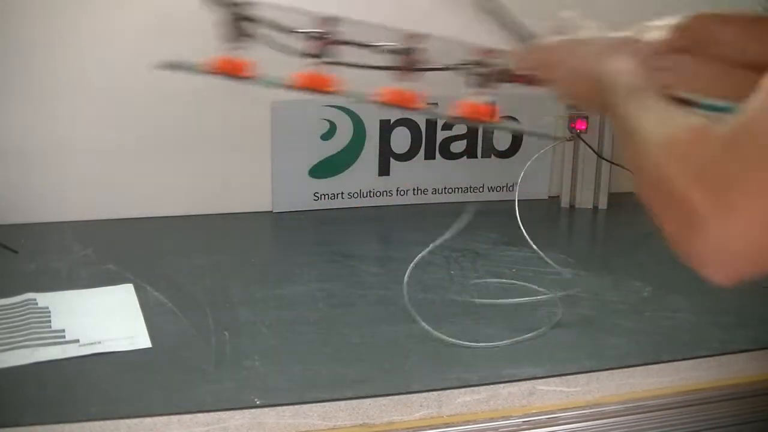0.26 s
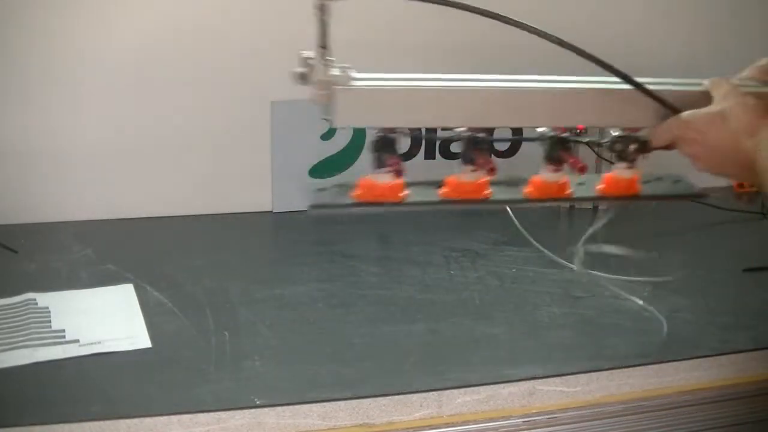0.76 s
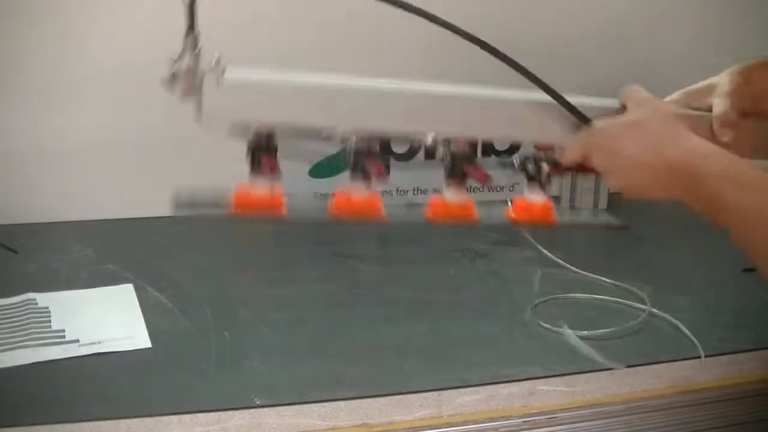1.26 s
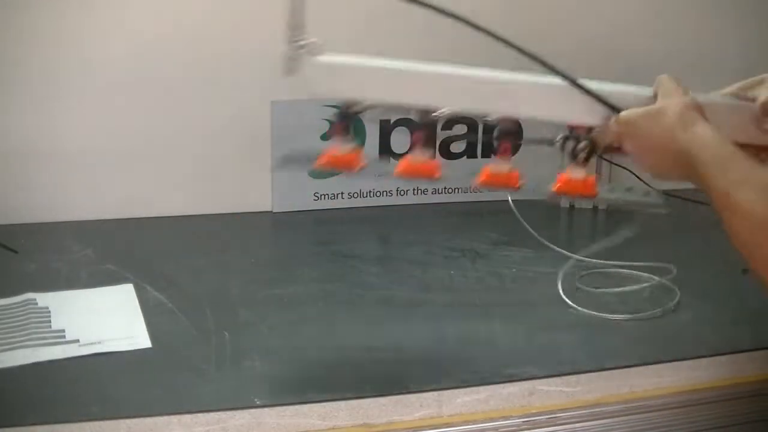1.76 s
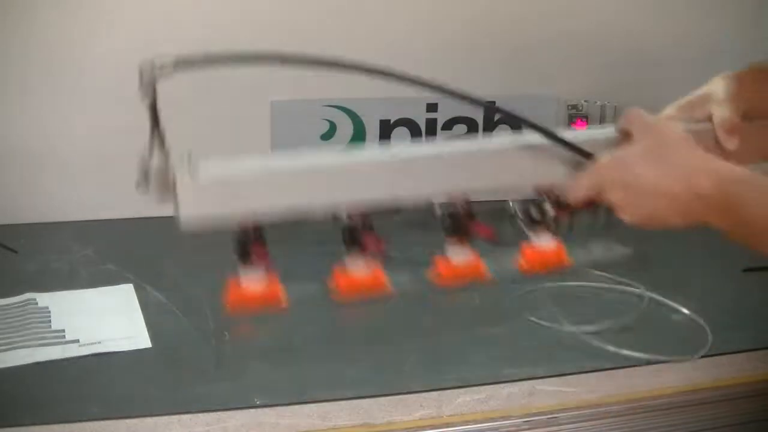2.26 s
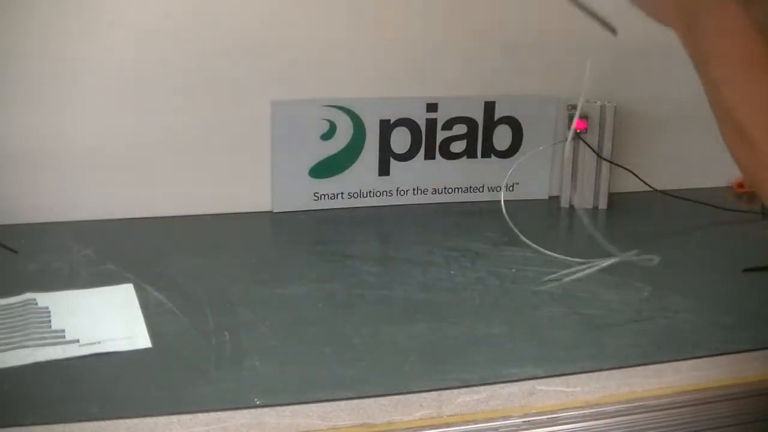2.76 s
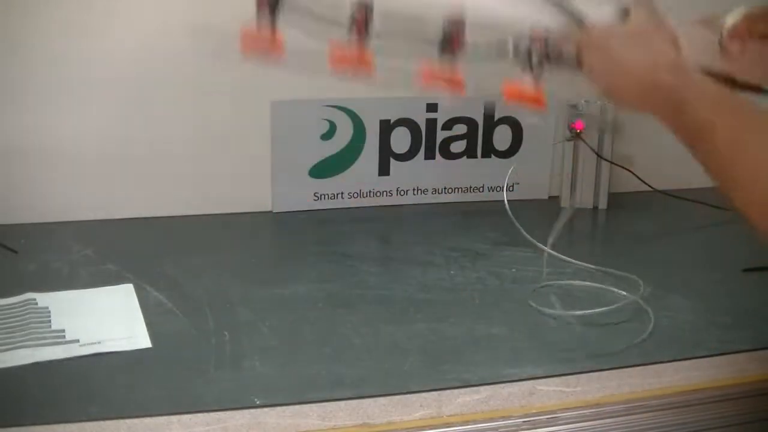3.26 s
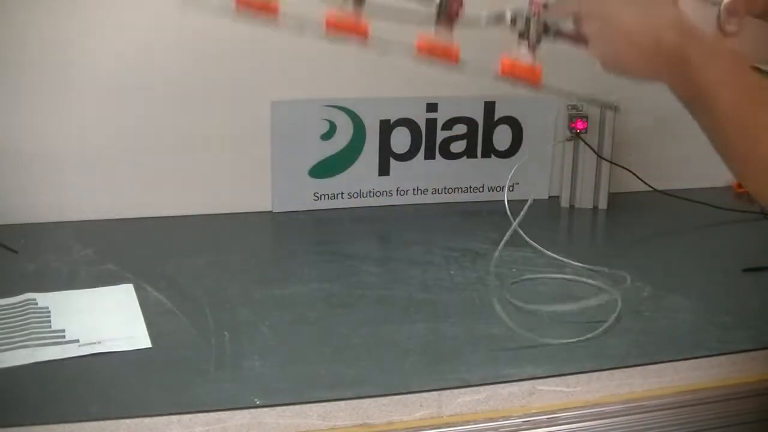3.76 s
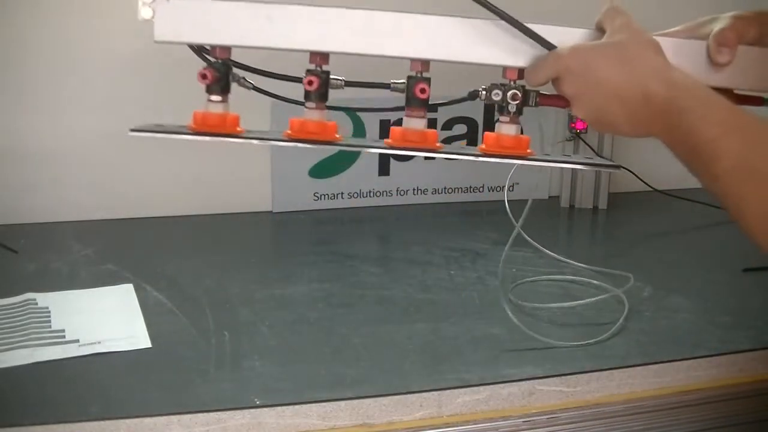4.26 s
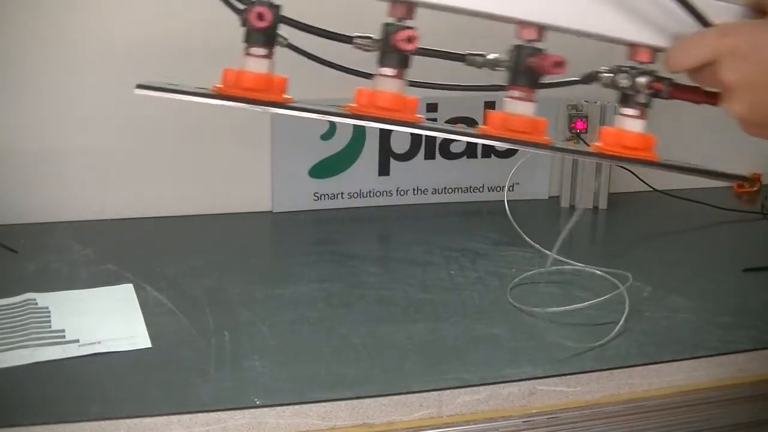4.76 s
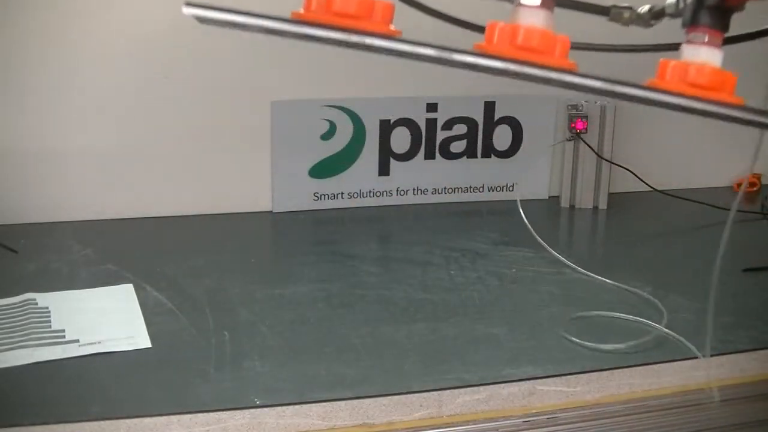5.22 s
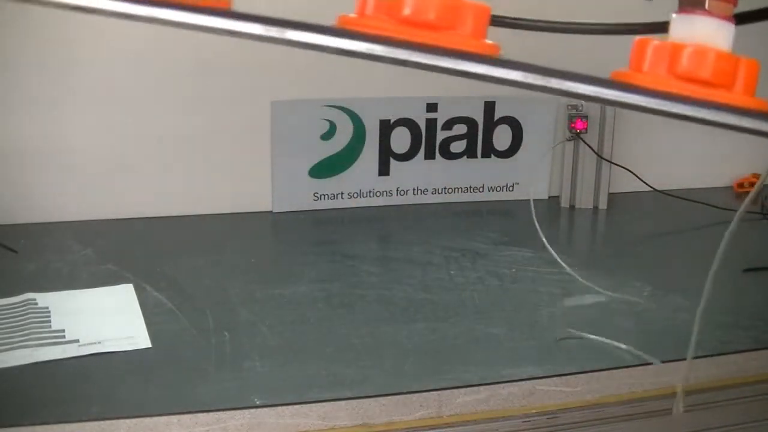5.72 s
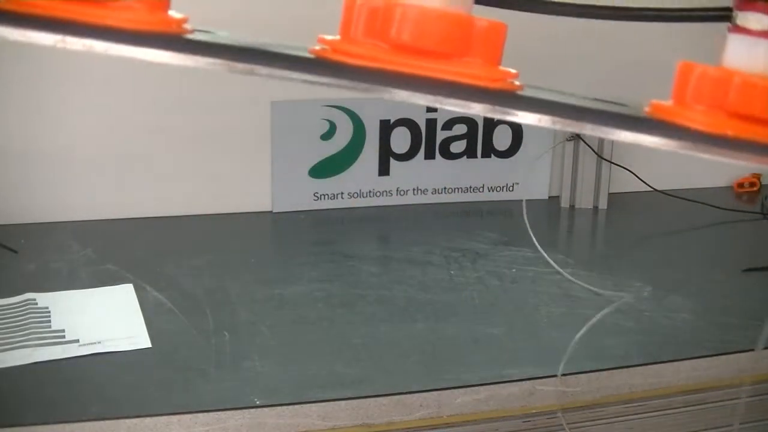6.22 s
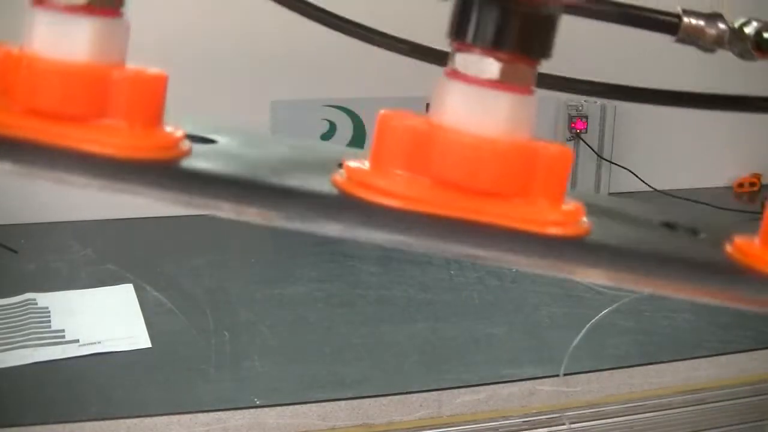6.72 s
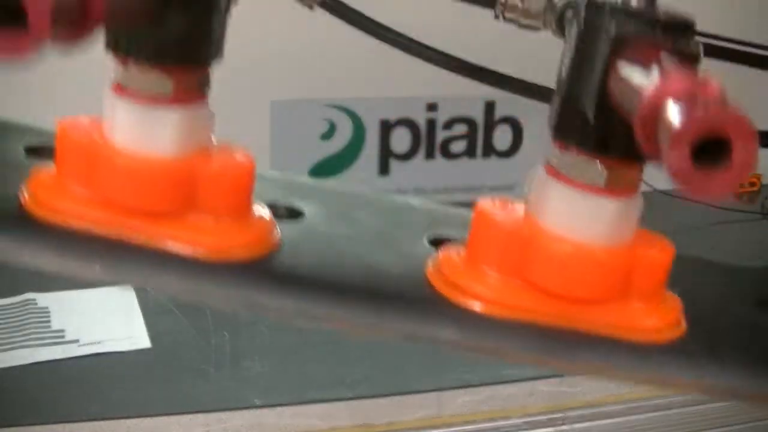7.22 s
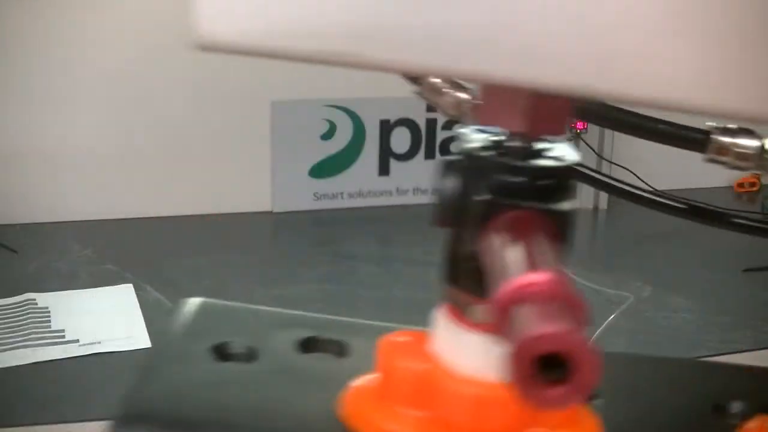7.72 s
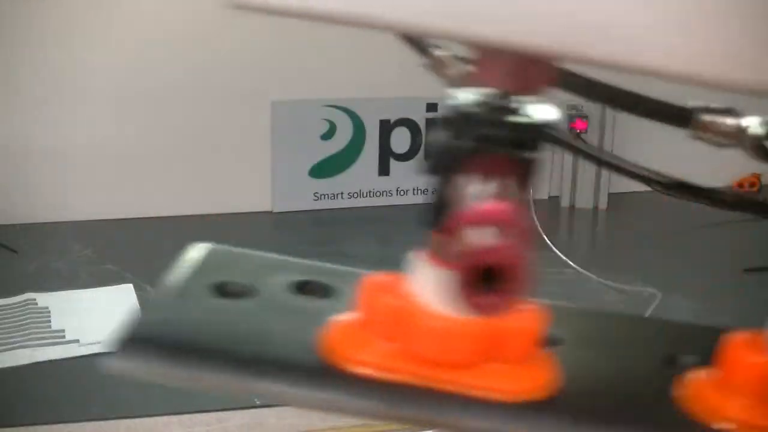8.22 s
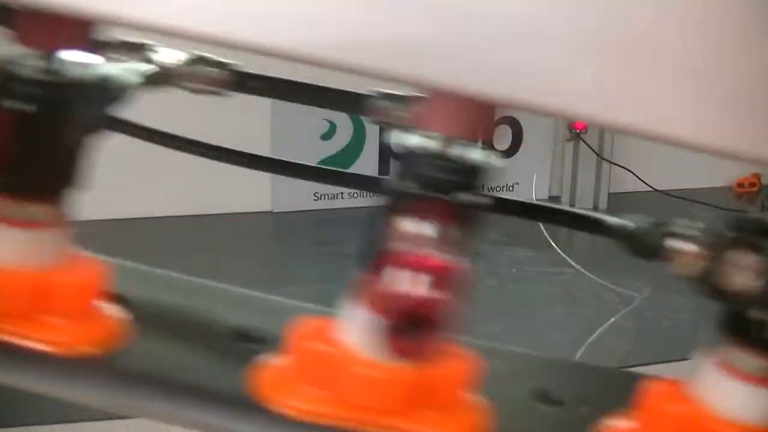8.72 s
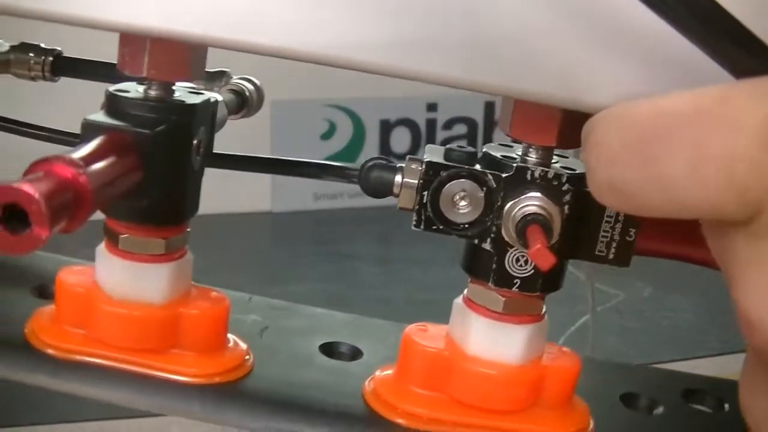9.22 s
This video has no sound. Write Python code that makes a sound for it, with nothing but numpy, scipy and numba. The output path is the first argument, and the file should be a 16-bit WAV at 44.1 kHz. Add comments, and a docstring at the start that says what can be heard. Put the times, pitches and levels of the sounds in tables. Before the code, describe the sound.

Small air jets on a vacuum gripper hiss without a break, high and sharp over a softer roar, changing colour slightly as they move. A faint machine hum cuts out midway, leaving low workshop ventilation underneath. In the second half the jets draw near the microphone and their draught hits it in short, fluttering gusts. The hiss ends close and wide in stereo.

```python
"""A bright, steady hiss of air: four small ejectors on a hand-held vacuum gripper, swung about in a
workshop and then brought close to a stereo camera. The jets ring their nozzles at two broad pitches
over a lower roar, and a bounce off the bench combs the sound. Puffs of exhaust buffet the two
microphone ports, mostly in opposite senses. Behind it the ventilation murmurs, and a machine drones
for about the first five seconds."""
import sys
import numpy as np
from scipy import signal
from scipy.fft import rfft, irfft, next_fast_len
from scipy.io import wavfile
from scipy.ndimage import uniform_filter1d, map_coordinates
from numba import njit

SR = 44100
rng = np.random.default_rng(int(sys.argv[2]) if len(sys.argv) > 2 else 0)


def log_audio(samples):
    """Write samples as a 16-bit WAV file to the path given in sys.argv[1]."""
    # one column per channel
    frames = np.atleast_2d(samples).T
    # limit to full scale, then quantise
    limited = np.clip(frames, -1, 1)
    pcm = np.round(limited * 32767).astype(np.int16)
    wavfile.write(sys.argv[1], SR, pcm)


N = 418068

# How the gripper is held. Each row: time in seconds, aim of the exhausts at the camera from 0 to 1,
# nearness from 0 to 1, level of the first ring in dB.
GRIPPER_POSE = [(0, 0.6, 0.5, -20.5), (.35, 0.35, 0.15, -20.5), (.7, 0.6, 0.25, -21.5),
                (1.1, 0.87, 0, -20.5), (1.55, 0.36, 0.3, -21.5), (2.1, 0.88, 0, -20.5),
                (2.55, 0.23, 0.05, -22.5), (2.85, 0.1, 0, -21.5), (3.1, 0.7, 0.2, -20), (3.4, 0.1, 0, -22),
                (3.75, 0.16, 0, -22), (4.05, 0.43, 0.1, -19), (4.5, 0.24, 0, -20), (5.1, 0, 0, -22.5),
                (5.6, 0.1, 0.34, -23.5), (7.1, 0.27, .8, -24.3), (7.5, 0.63, 0.7, -24),
                (8.05, 0.8, 0.6, -23.5), (8.35, 0.66, 0.6, -24), (9, 0.7, 0.9, -24.5), (9.48, 0.6, 1, -23)]
# Colours of the jets: bright rush, top fizz, low roar. Each row: frequency in Hz, relative level in dB.
RUSH_SPECTRUM = [(4000, -27), (5000, -25), (7500, 9.5), (9500, 6.5), (11000, 6.5), (13000, -46)]
FIZZ_SPECTRUM = [(10500, -14), (12300, 11), (13200, 5), (14300, 8), (15600, 9.5), (17000, -12)]
ROAR_SPECTRUM = [(500, -43), (750, -18.5), (1050, -14.5), (1500, -9), (1900, -5), (2250, -0.5),
                 (2650, -5.5), (3400, -19)]
# Slow fader ride on the roar and tube ring. Each row: time in seconds, level change in dB.
LOW_HISS_RIDE = [(0, -0.1), (1.2, -0.5), (2.2, -0.7), (3.8, .1), (4.5, 1.5), (5.2, -1.3), (6.5, -.3),
                 (8.2, -0.3), (9.48, 1.9)]
# Puffs of exhaust across the microphones. Each row: peak time in seconds, half length in seconds,
# rumble in dB, flutter in dB, the part alike at both ports in dB relative to the opposed part.
EXHAUST_PUFFS = [(4.49, .05, -47, -72, -4), (4.58, 0.065, -46.5, -72, 0.5), (4.69, 0.048, -43.5, -74, -2.5),
                 (4.934, .07, -43, -75, -2), (6.04, .04, -62, -77, -6), (6.28, 0.11, -62, -82, -6),
                 (6.39, 0.026, -37, -65, -1), (6.48, 0.1, -31.5, -59, -7), (6.62, 0.1, -33, -44, -3.5),
                 (6.787, 0.088, -30, -33, -6.5), (6.87, .07, -30, -35.5, -6.5),
                 (6.974, 0.11, -35.5, -34.5, -7), (7.086, 0.12, -45, -49, -4),
                 (7.258, 0.064, -41, -40, -6.5), (7.428, 0.16, -42, -50, -3.5),
                 (7.65, 0.09, -31, -28, -4.5), (7.782, 0.093, -43, -27.5, -8), (7.924, 0.086, -55, -46, -2),
                 (8.2, 0.071, -45, -39.5, -6.5), (8.286, 0.084, -48, -24, -7),
                 (8.567, 0.079, -49, -32.5, -6), (8.778, 0.075, -50, -29.5, -5.5)]
# Colours of the draught: deep rumble, higher flutter. Each row: frequency in Hz, relative level in dB.
RUMBLE_SPECTRUM = [(15, -18), (40, -6), (70, 2.5), (110, 2.5), (170, 1.5), (260, -6.5), (400, -12.5),
                   (700, -33), (1200, -56)]
FLUTTER_SPECTRUM = [(100, -22), (170, -12), (260, -5.5), (400, -1.5), (600, -1.5), (900, -7), (1400, -10.5),
                    (2000, -14), (3200, -32)]
# Colour of the room's ventilation. Each row: frequency in Hz, relative level in dB.
VENTILATION_SPECTRUM = [(15, -30), (25, -11), (60, -10), (124, -10), (350, -10.5), (600, -9), (1100, -14),
                        (1500, -35)]

# Mix settings that follow the pose. Each holds, in dB: the value when turned away and far, then the
# change when aimed, when near, and once alongside the camera.
SECOND_RING_DB, RUSH_DB, FIZZ_DB = (-25, -7.5, 0.2, -4), (-31.5, 4.5, -1.5, -1.5), (-29, -7, 2, -1.3)
ROAR_DB, TUBE_DB, GAP_DB = (-38, 2.4, -1.7, -4.5), (-31, -3.5, 1.5, -3.2), (-38.5, 9.5, -0.5, 0.5)
HIGH_SPREAD_DB, LOW_SPREAD_DB = (-13.5, -0.4, 6.5, 1), (-44, -3, 1, 37.5)
PAN_DB = (2.5, 0.2, -0.6, 1.5)

FIRST_RING_HZ, FIRST_WIDTH_HZ, SECOND_RING_HZ, SECOND_WIDTH_HZ = 6050, 1480, 11635, 2440
TUBE_HZ, TUBE_WIDTH_HZ, GAP_HZ, GAP_WIDTH_HZ = 3343, 1510, 5150, 4100
MONO_BELOW_HZ = 4005  # the bright hiss is centred below this and wide above it
PUFF_FALL_DB = 13.5  # one half length away from the peak
BENCH_LAG_MS, BENCH_SWING_MS, BENCH_DB = 1.277, 0.311, -18
DRONE_HZ, DRONE_DB, VENTILATION_DB = 417, -52, -53.5


def ejectors():
    """Jet noise in and around two nozzle rings, centred below about 4 kHz and wide above it."""
    aim, near, first_db = curves(GRIPPER_POSE)
    spread_db, pan_db = posed(HIGH_SPREAD_DB), posed(PAN_DB)
    first_hz = FIRST_RING_HZ + np.maximum(260 * aim * (1 - near), 80 * near)
    second_hz = (SECOND_RING_HZ - 400 * aim) * (1 + 0.006 * wander(2.99))
    flow_db = 0.43 * wander(25)  # the air supply is never quite even
    first_db = first_db + 0.45 * wander(12)
    first = undb(first_db) * stereo(*rings(first_hz, FIRST_WIDTH_HZ), spread_db + 1, pan_db)
    second_db = posed(SECOND_RING_DB) + flow_db
    second = undb(second_db) * stereo(*rings(second_hz, SECOND_WIDTH_HZ), spread_db + 6, pan_db)
    rush_db = posed(RUSH_DB) + 1.05 * wander(18)
    rush = undb(rush_db) * stereo(*noises(RUSH_SPECTRUM), spread_db + 9, pan_db)
    fizz = undb(posed(FIZZ_DB) + flow_db) * stereo(*noises(FIZZ_SPECTRUM), spread_db + 5, pan_db)
    left, right = first + second + rush + fizz
    highpass = signal.cheby2(8, 50, MONO_BELOW_HZ, "high", fs=SR, output="sos")
    side = signal.sosfilt(highpass, (left - right) / 2)
    side = signal.sosfilt(highpass, side[::-1])[::-1]  # a backward pass undoes the phase shift
    return stereo((left + right) / 2, side)


def nozzle_notch(jets):
    """The nozzles partly cancel between the rings: a broad scoop, lower when near, filled when aimed."""
    aim, near, _ = curves(GRIPPER_POSE)
    notch_hz, depth = 9560 - 1500 * near, 0.42 * (1 - aim)
    return np.array([channel - depth * bandpass(channel, notch_hz, width_hz=2100) for channel in jets])


def low_hiss():
    """The body of the hiss: roar, tube and gap rings, nearly mono until the gripper is alongside."""
    drift = 1 + 0.015 * wander(2.45)
    flow_db = curves(LOW_HISS_RIDE)[0] + 0.68 * wander(9)
    roar = undb(posed(ROAR_DB) + flow_db) * noises(ROAR_SPECTRUM)
    tube = undb(posed(TUBE_DB) + flow_db) * rings(TUBE_HZ * drift, TUBE_WIDTH_HZ)
    gap = undb(posed(GAP_DB)) * rings(GAP_HZ * drift, GAP_WIDTH_HZ)
    return stereo(*(roar + tube + gap), posed(LOW_SPREAD_DB))


def bench_bounce(direct):
    """A second path off the bench top; its lag wanders with the hand and combs the hiss."""
    lag = (BENCH_LAG_MS + BENCH_SWING_MS * wander(2.5)) * SR / 1000
    echo = [map_coordinates(channel, [np.arange(N) - lag], order=3, mode="mirror") for channel in direct]
    return (direct + undb(BENCH_DB) * np.array(echo)) / np.sqrt(1 + undb(2 * BENCH_DB))


def draught():
    """Eddies strike the ports in quick uneven lumps, mostly pushing one while they pull the other."""
    lumps_db = 2.15 * wander(80)
    rumble = unit_rms(undb(lumps_db)) * noises(RUMBLE_SPECTRUM)
    flutter = unit_rms(undb(1.37 * lumps_db)) * noises(FLUTTER_SPECTRUM)
    t = np.arange(N) / SR
    power = np.zeros((2, 2, N))  # rumble or flutter, opposed or alike, sample
    for peak_s, half_s, rumble_db, flutter_db, alike_db in EXHAUST_PUFFS:
        span = slice(int((peak_s - 3 * half_s) * SR), int((peak_s + 3 * half_s) * SR))
        swell_db = -PUFF_FALL_DB * np.abs((t[span] - peak_s) / half_s) ** 3  # cubed for a flat top
        peak_db = np.add.outer([rumble_db, flutter_db], [0, alike_db])
        power[..., span] += undb(peak_db[..., None] + swell_db) ** 2
    opposed, alike = np.sqrt(power[0]) * rumble + np.sqrt(power[1]) * flutter
    return stereo(alike, opposed)


def machine_drone():
    """A wavering machine tone whose octave weakens early; it is switched off part-way."""
    phase = 2 * np.pi * np.cumsum(DRONE_HZ * (1 + 0.0015 * wander(3.12))) / SR
    tone_db = DRONE_DB - 1.5 * wander(4.08)
    octave_db = -56 - 11 * ramp(start_s=0.79, length_s=0.2) + 2 * wander(3.25)
    running = 1 - ramp(start_s=4.76, length_s=0.11)
    return np.sqrt(2) * running * (undb(tone_db) * np.sin(phase) + undb(octave_db) * np.sin(2 * phase))


def ventilation():
    """The workshop's low murmur; it widens and drops in level near the end."""
    late_drop_db = -5.5 * ramp(start_s=8.85, length_s=0.067)
    level_db = VENTILATION_DB + late_drop_db + 0.9 * wander(8.2)
    return undb(level_db) * stereo(*noises(VENTILATION_SPECTRUM), posed(LOW_SPREAD_DB) + 11.5)


def posed(setting):
    """A dB curve that follows aim, nearness and the final place beside the camera."""
    base_db, aimed_db, near_db, alongside_db = setting
    aim, near, _ = curves(GRIPPER_POSE)
    alongside = ramp(start_s=8.55, length_s=0.14)
    return base_db + aimed_db * aim + near_db * near + alongside_db * alongside


def rings(hz, width_hz):
    """Two independent streams of turbulence through a resonance, filtered twice for steep sides."""
    turbulence = rng.standard_normal((2, N))
    return np.array([unit_rms(bandpass(bandpass(x, hz, width_hz), hz, width_hz)) for x in turbulence])


def noises(spectrum):
    """Two independent noises of rms 1 in the given colour, falling away outside it."""
    size = next_fast_len(N)
    hz, db = np.transpose(spectrum)
    log_hz = np.log(np.arange(size // 2 + 1) * SR / size + 1)
    gain = undb(np.interp(log_hz, np.log(hz), db, left=-80, right=-80))
    return np.array([unit_rms(irfft(rfft(x) * gain, size)[:N]) for x in rng.standard_normal((2, size))])


@njit
def bandpass(x, hz, width_hz):
    """A sweepable state-variable band-pass, gain 1 at its centre."""
    y, band_state, low_state = np.empty(len(x)), 0., 0.
    for i in range(len(x)):
        tuning, damping = np.tan(np.pi * hz[i] / SR), width_hz / hz[i]
        band = (band_state + tuning * (x[i] - low_state)) / (1 + tuning * (tuning + damping))
        band_state, low_state = 2 * band - band_state, low_state + 2 * tuning * band
        y[i] = damping * band
    return y


def wander(rate_hz):
    """Random steps smoothed twice into a drift of rms 1."""
    hold = int(SR / rate_hz)
    steps = np.repeat(rng.standard_normal(N // hold + 1), hold)
    return unit_rms(uniform_filter1d(uniform_filter1d(steps, hold), hold)[:N])


def stereo(mid, side, spread_db=0, pan_db=0):
    """Left and right from mid and side; positive pan leans left."""
    sign = np.array([[1], [-1]])
    return (mid + undb(spread_db) * side * sign) * undb(sign * pan_db / 2)


def curves(table):
    """A timed table's columns as automation curves."""
    times, *columns = np.transpose(table)
    return [np.interp(np.arange(N) / SR, times, column) for column in columns]


def ramp(start_s, length_s):
    """A straight fade from 0 to 1."""
    return np.clip((np.arange(N) / SR - start_s) / length_s, 0, 1)


def undb(db):
    """Decibels to gain."""
    return 10 ** (np.asarray(db) / 20)


def unit_rms(x):
    """Scaled to rms 1."""
    return x / np.sqrt(np.mean(x ** 2))


def scene():
    """Jets over the bench, their draught, the drone and the room."""
    hiss = nozzle_notch(ejectors()) + low_hiss()
    return bench_bounce(hiss) + draught() + machine_drone() + ventilation()


def record(dry):
    """The camera cuts the top off steeply."""
    return signal.sosfilt(signal.ellip(16, 0.2, 80, 15730, fs=SR, output="sos"), dry)


dry = scene()
out = record(dry)
log_audio(out)
```